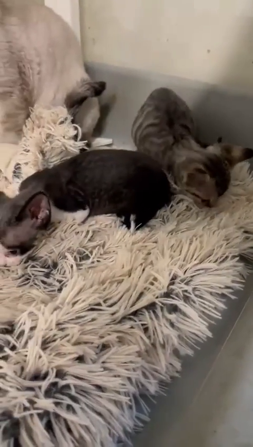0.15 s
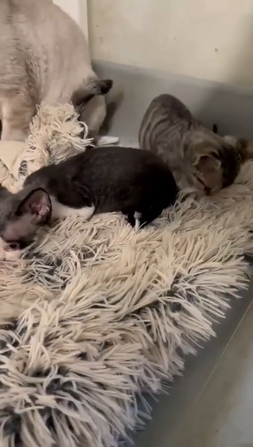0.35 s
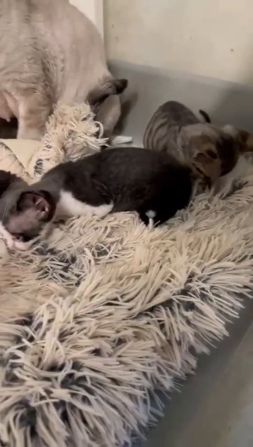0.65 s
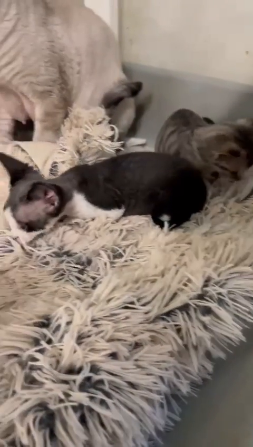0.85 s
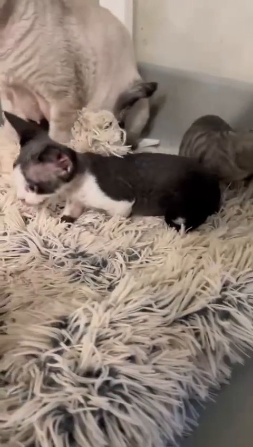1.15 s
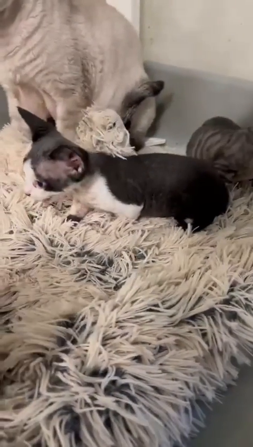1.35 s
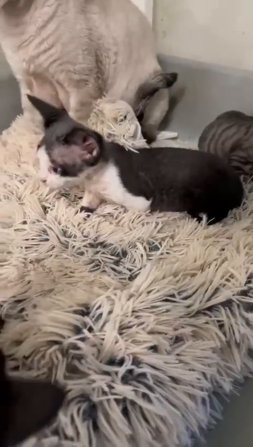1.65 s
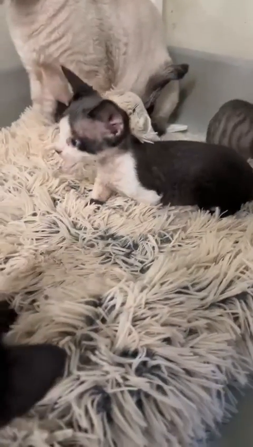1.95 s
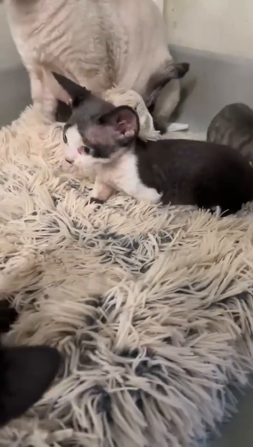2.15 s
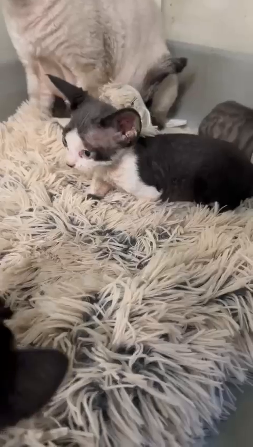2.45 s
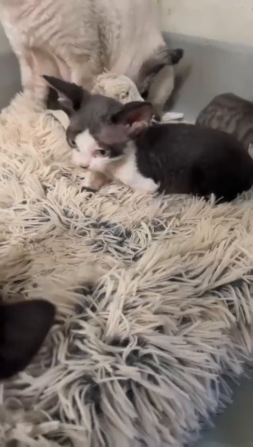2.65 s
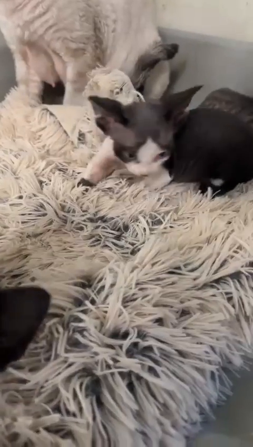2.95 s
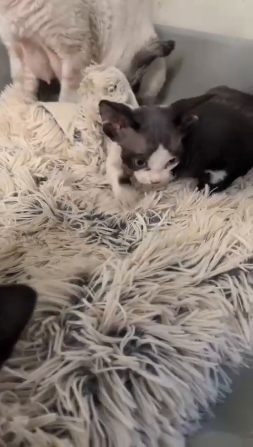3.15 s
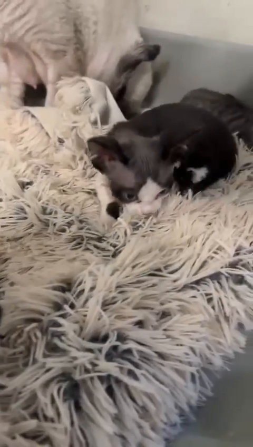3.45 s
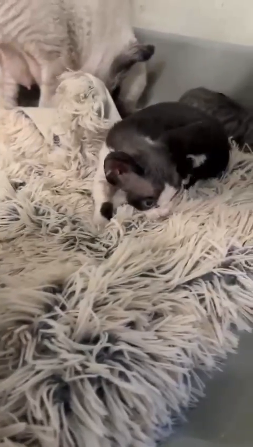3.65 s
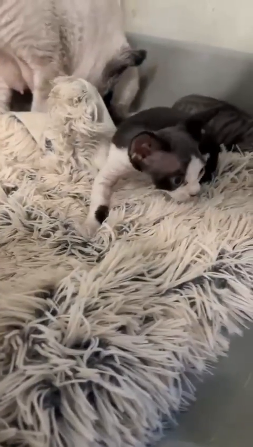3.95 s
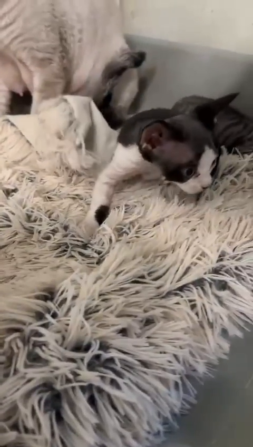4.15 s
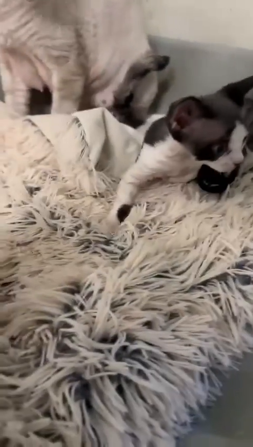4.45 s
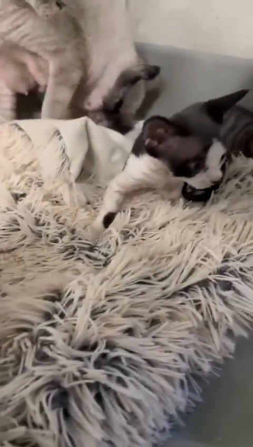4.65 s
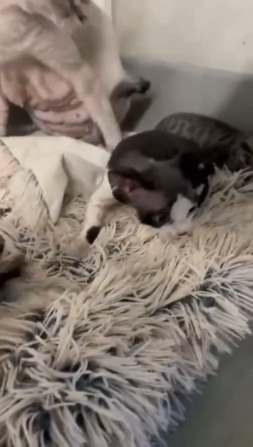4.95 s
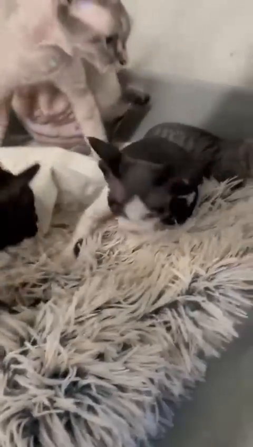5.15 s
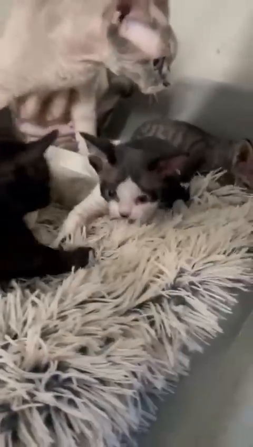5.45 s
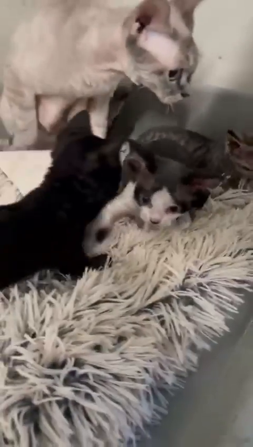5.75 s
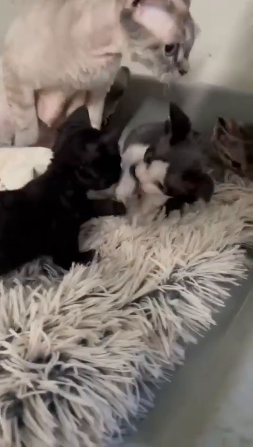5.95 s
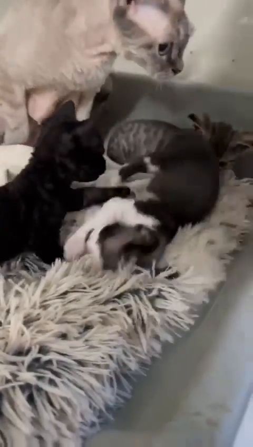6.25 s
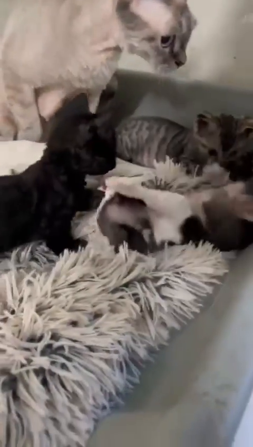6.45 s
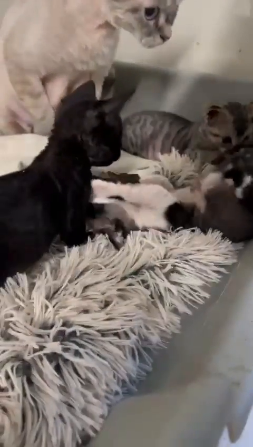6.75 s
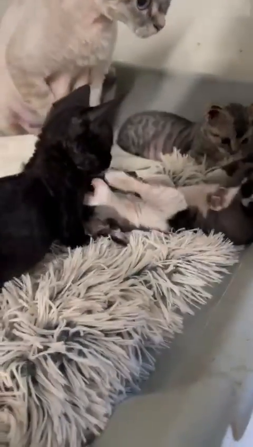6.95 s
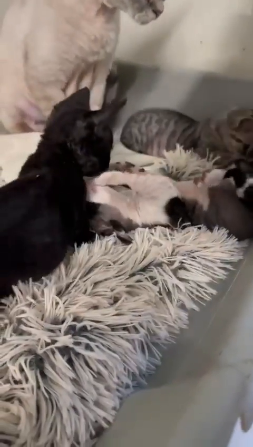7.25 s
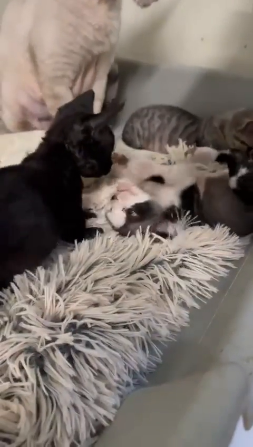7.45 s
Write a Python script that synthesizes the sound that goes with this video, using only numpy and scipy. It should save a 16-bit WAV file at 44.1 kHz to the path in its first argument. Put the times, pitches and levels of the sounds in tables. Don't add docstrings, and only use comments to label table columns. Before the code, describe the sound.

Close phone pickup in a small hard room, with a low steady hiss underneath. From 0 to 1 s, kittens shift on a shaggy rug in a plastic tub: deep muffled booms, soft thuds, rug shuffling, short fur drags and small claw ticks. From 1 to 1.8 s it thins to light ticks and rustle. A very faint closed-mouth chirp at about 1.9 s leads into the strongest scuffle, 2.0 to 2.3 s, with heavy soft thumps and bright scrapes on plastic. Smaller bumps and rustles fade through 3.5 s, then near quiet. At 4.4 s a kitten gives a half-second high, nasal, trilled mew, sinking in pitch and closing with a tiny gulp. At 5.06 s a sharp hollow knock rattles and rings the tub, rebounding quickly. Claw ticks follow near 5.2 and 5.75 s, a deep soft thump at 6.4 s, then faint rustling until 7.6 s.

```python
import sys
import numpy as np
from scipy import signal
from scipy.fft import rfft, irfft, next_fast_len
from scipy.io import wavfile
from scipy.ndimage import uniform_filter1d

SR = 44100
rng = np.random.default_rng(int(sys.argv[2]) if len(sys.argv) > 2 else 0)


def rack_gain(trim_db):
    fader = np.asarray(trim_db, float)
    return 10 ** (fader / 20)


def bounce(signal):
    frames = np.transpose(np.atleast_2d(signal))
    limited = np.clip(frames, -1, 1)
    pcm = np.round(limited * 32767).astype(np.int16)
    wavfile.write(sys.argv[1], SR, pcm)


N = 334895


def shape(x, points):
    hz, db = np.transpose(points)
    size = next_fast_len(len(x))
    f = np.fft.rfftfreq(size, 1 / SR) + 1
    gain = rack_gain(np.interp(np.log(f), np.log(hz), db))
    return irfft(rfft(x, size) * gain, size)[:len(x)]


def unit(x):
    return x / np.sqrt(np.mean(x ** 2))


def resonate(x, modes):
    out = 0
    for hz, width_hz, db in modes:
        b, a = signal.iirpeak(hz, hz / width_hz / 1.3, SR)
        once = signal.lfilter(b, a, x)
        out = out + rack_gain(db) * signal.lfilter(b, a, once)
    return out


def walk(rate_hz):
    k = int(SR / rate_hz)
    held = np.repeat(rng.standard_normal(N // k + 1), k)
    return 1.3 * uniform_filter1d(uniform_filter1d(held, k), k)[:N]


def grit(spread_db):
    return rng.standard_normal(N) * rack_gain(spread_db * walk(600))


def curves(table, outside=None):
    s, *columns = np.transpose(table)
    return [np.interp(np.arange(N) / SR, s, c, outside, outside) for c in columns]


def moves(peak_s, db, fade_s, rise):
    s, db, fade_s = np.array([peak_s, db, fade_s])[:, :, None]
    t = np.arange(0, N, 32) / SR
    away_s = np.maximum(t - s, (s - t) / rise)
    gain = rack_gain(db - 20 * away_s / np.maximum(fade_s, 0.02)).sum(axis=0)
    return np.interp(np.arange(N) / SR, t, gain)


def ring(hz, t60_s):
    t60_s = max(t60_s, 0.002)
    t = np.arange(int(1.2 * t60_s * SR)) / SR
    return np.sin(2 * np.pi * hz * t) * np.exp(-np.log(1000) * t / t60_s)


def soft_ring(hz, t60_s):
    push_s = 0.004
    body = ring(hz, t60_s)
    return body * np.minimum(np.arange(len(body)) / SR / push_s, 1)


def add(out, s, x):
    i = int(s * SR)
    out[i:i + len(x)] += x[:N - i]


def scuffle():
    # start_s, level_db
    bustle_levels = [(0, -51.5), (.5, -50), (1.0, -52), (1.35, -63.5), (1.9, -53), (2.3, -62), (2.7, -56),
                     (3.1, -59.5), (3.5, -53.5), (4.2, -69), (4.7, -63), (5.2, -57.5), (5.6, -58.5),
                     (6.1, -63.5), (6.6, -59.5), (7.0, -60.5), (7.59, -66)]
    # peak_s, floor_db, wall_db, fade_20db_s
    shoves = [(0.0, -58, -47.5, 0.24), (0.19, -40, -57.5, 0.22), (0.359, -45, -53, 0),
              (0.571, -41, -46, 0.01), (0.831, -59, -72, 0.06), (1.2, -71, -63.5, 0.09),
              (1.46, -56.5, -82, 0.16), (1.548, -71.5, -57, 0), (1.77, -57, -58, 0.06),
              (2.02, -37, -35, .075), (2.11, -45, -60, .12), (2.246, -42, -53, 0.17),
              (2.543, -47.5, -50.5, 0.0942), (2.877, -44.5, -54, -0.05), (3.33, -55, -62, -0.24),
              (3.6, -89, -76.5, 1), (4.4, -60, -76.5, 0.32), (4.56, -89, -67.5, 0.12),
              (4.88, -81, -71.5, 0.25), (5.095, -41.5, -48, 0.07), (5.65, -64, -73, 0.5),
              (5.771, -47.5, -52.5, -0.47), (6.3, -56.5, -98, 0.24), (6.409, -31.5, -44.5, -0.0373),
              (7.38, -65, -72, 0.84)]
    # peak_s, rug_db, fur_db, fade_20db_s
    stirs = [(0.0, -56, -69.5, 0.45), (0.26, -55.5, -72, 0.07), (0.422, -67, -81, 0.4),
             (0.752, -85, -87, 3.5), (1.064, -66, -87, 0.14), (1.41, -103, -105, 2),
             (1.534, -72, -72, 0.24), (1.84, -61, -90, .5), (2.09, -48, -57, 0.2135),
             (2.261, -59, -65.5, 0.1), (2.464, -86, -56.5, -0.15), (2.603, -56, -96, -0.59),
             (2.666, -110, -80, 1.8), (2.829, -59.5, -90, -0.34), (3.074, -79, -92, 0.3),
             (3.248, -76, -71, 0), (3.427, -63.5, -66, -0.24), (3.97, -70, -84, -0.05),
             (4.072, -101, -71, 0.3), (4.312, -76, -82, 0.4), (4.938, -69.5, -67, 0.54),
             (5.25, -69, -67, -0.78), (5.442, -88, -68, .5), (5.72, -78.5, -76, 0.63),
             (6.18, -77, -66, 0.25), (6.35, -99, -68, 0.16), (6.46, -78.5, -74, 0.7),
             (6.556, -81, -68.5, 0), (7.126, -74, -74, 0.14), (7.39, -72.5, -66.5, 0.3)]
    # mode_hz, width_hz, level_db
    floor_modes = [(53.3, 15, 3), (71.7, 15.7, 1.5), (90, 18.9, -3.5), (113.8, 21, -13.5)]
    # mode_hz, width_hz, level_db
    wall_modes = [(150, 38, -7), (229.4, 47, -5), (280.3, 33, -1), (306.7, 16.6, -2.5), (390.6, 51, -13.5)]
    # freq_hz, level_db
    rug_colour = [(250, -5.5), (420, -13.5), (1200, -10), (2180, -3.5), (2390, -11), (2580, -7),
                  (5650, -16.5), (9480, -25.5), (10000, -20.5), (13000, -38), (22000, -120)]
    shove_rise, stir_rise, floor_linger = 0.72, 0.52, 1.62

    bustle_db = curves(bustle_levels)[0] + 60

    def bed(db, slope):
        return rack_gain(db - 60 + slope * bustle_db)

    s, floor_db, wall_db, fade_s = np.transpose(shoves)
    floor = bed(1, 0.93) + moves(s, floor_db, fade_s * floor_linger, shove_rise / floor_linger)
    walls = bed(-21.5, 1.44) + moves(s, wall_db, fade_s, shove_rise)
    s, rug_db, fur_db, fade_s = np.transpose(stirs)
    paws = bed(-31, 2.2) + moves(s, rug_db, fade_s, stir_rise)
    coats = bed(-17, 0.92) + moves(s, fur_db, fade_s, stir_rise)

    rug = shape(grit(2.03), rug_colour)
    shuffle = shape(rug, [(600, 3.5), (780, 1.5), (1000, -4.5), (1300, -6.0), (1600, -30.5)])
    boom = unit(resonate(rng.standard_normal(N), floor_modes)) * floor * rack_gain(-2.5)
    drumming = unit(resonate(rng.standard_normal(N) * rack_gain(3.74 * walk(25)), wall_modes)) * walls
    shuffling = unit(shuffle) * paws * rack_gain(2.9 * walk(22) - 1.5)
    rustle = unit(rug - shuffle) * coats * rack_gain(2.8 * walk(44) - 6.0)
    return boom + drumming + shuffling + rustle


def hiss():
    # freq_hz, level_db
    hiss_colour = [(140, -45), (240, -9), (290, 1.5), (368, -9.5), (640, -10), (935, -14), (1390, -10),
                   (1790, 0.5), (2230, 2), (3300, -7), (4600, -20.5), (5600, -14), (6850, -21),
                   (7900, -25.5), (8820, -38), (10500, -40), (13600, -73), (22000, -120)]
    level_db = -72.5
    air = shape(rng.standard_normal(N), hiss_colour)
    bands = 0
    for hz in (350, 700, 1400, 2600, 4800, 8000):
        bands = bands + resonate(air, [(hz, hz, 0)]) * rack_gain(1.67 * walk(4.1))
    return unit(bands) * rack_gain(level_db - 1.5)


def scrapes():
    # start_s, peak_db, length_s, low_part_db, claw_squeak_db
    drags = [(0.099, -48.5, 0.045, 2.5, -12), (0.15, -51.5, 0.074, 10, 4), (0.538, -51, 0.049, 0, 2),
             (0.585, -54.5, 0.09, -0.5, -8), (0.795, -55, 0.055, -3.5, -16),
             (0.871, -52.5, 0.084, -5.5, -34), (1.735, -56.5, 0.056, -2.5, -28),
             (1.967, -40, 0.035, -5, -19), (1.987, -34, 0.027, -12.5, -34), (2.004, -31, 0.036, -5.5, -22),
             (2.034, -45, 0.058, 0.5, -17), (2.156, -36, 0.014, -15, 7.5), (2.166, -27.5, 0.033, -12, -4.5),
             (2.199, -29, 0.019, -16, -3), (2.508, -69, 0.065, 17.5, 0), (2.661, -56.5, 0.037, -27, -30),
             (2.829, -70, 0.09, 7.5, -22), (3.983, -63, 0.063, -0.5, -5), (5.001, -50.5, 0.057, -7, -11),
             (6.145, -71.5, 0.069, -34, -2.5), (6.366, -60, 0.072, -3, -3), (7.34, -60, 0.1, -5, 3)]
    # freq_hz, level_db
    fur_colour = [(760, -61), (1300, -3.5), (1800, -15.5), (2010, -5.5), (2820, -10), (3000, -6.5),
                  (3570, -3), (4700, -6), (6200, -6.5), (7950, -13.5), (9280, -15), (10400, -21.5),
                  (11400, -104), (14900, -111), (22000, -120)]
    # mode_hz, width_hz, level_db
    squeak_modes = [(2103, 610, 0.5), (2720, 170, -3), (1050, 96, -2.5)]
    patch_hz = (1300, 2100, 3000, 4200, 5600, 7200)
    clump_db = 5
    drag_rise, hard_drag_db, rise_per_db = 0.3, -45, 0.002

    bright, dull, claw = np.zeros((3, N))
    for s, db, length_s, low_db, claw_db in drags:
        rise = drag_rise + rise_per_db * max(db - hard_drag_db, 0)
        if length_s <= 0.02:
            rise = 0.1
        u = np.arange(int(3 * length_s * SR)) / SR / length_s
        fade = 1 / (1 + u ** 8)
        swell = np.minimum(u / np.clip(rise, 0.02, 0.9), 1) * fade
        add(bright, s, rack_gain(db - 14.5) * swell)
        add(claw, s, rack_gain(db + claw_db - 14.5) * np.minimum(u * 12, 1) * fade)
        add(dull, s, rack_gain(db + low_db - 9.0) * swell)

    steps = walk(120)
    slip = rack_gain(1.54 * steps)
    fur = shape(grit(0.36), fur_colour)
    patches = 0
    for k, hz in enumerate(patch_hz, 1):
        catch = rack_gain(clump_db * np.roll(steps, 977 * k) - 23)
        patches = patches + resonate(fur, [(hz, hz / 4, 0)]) * catch
    fur = fur + patches
    low = resonate(grit(0.54), [(560, 980, 51.0), (1050, 2300, 0.5)])
    squeak = resonate(grit(0.99), squeak_modes)
    return slip * (bright * unit(fur) + dull * unit(low) + claw * unit(squeak))


def thuds():
    # start_s, peak_db, mode_hz, t60_s
    soft_hits = [(0.165, -47, 53.3, 0.12), (0.571, -71, 49.3, 0.15), (0.822, -44, 82, 0.061),
                 (1.979, -32, 69, 0.33), (1.996, -35, 262, .09), (2.018, -27, 290, 0.08),
                 (2.035, -25.5, 98, 0.1), (2.077, -33, 117, 0.12), (2.286, -35, 55, 0.16),
                 (2.524, -38.5, 155, 0.094), (0.177, -35, 154, 0.11), (5.075, -36.5, 416, 0.092),
                 (5.087, -40.5, 350, 0.063), (5.1, -43, 490, 0.16), (5.22, -59.5, 1250, 0.072),
                 (6.475, -49, 256, 0.034), (5.086, -40.5, 187.4, 0.29), (5.113, -46, 141.2, 0.41),
                 (6.396, -39.5, 196, 0.079), (6.412, -30.5, 47, 0.36), (6.397, -51.5, 327, 0.046),
                 (0.81, -56.5, 292, 0.87), (1.001, -65, 309, 0.47), (4.315, -54, 150, .08)]
    out = np.zeros(N)
    for s, db, hz, t60_s in soft_hits:
        add(out, s, rack_gain(db + 2.5) * soft_ring(hz, t60_s))
    return out


def ticks():
    # start_s, peak_db, ring_hz, crack_db, wall_tock_db
    taps = [(0.167, -43, 804, -23, 1), (1.022, -60, 680, -30, 7), (1.33, -68, 700, -20, -1),
            (1.676, -60, 820, -25, -5), (1.056, -43, 1630, -14, -11), (1.404, -62, 2180, -11, 1.5),
            (1.538, -54.5, 1240, -18, -14), (1.598, -50, 1140, -14, -20), (2.112, -34, 2330, -2.5, -14),
            (2.464, -49.5, 1050, -11, -28), (2.523, -55.5, 700, -18, 6), (3.044, -61, 1850, -4, -16),
            (4.003, -59.5, 855, 3, 1.5), (2.687, -54, 9400, -12, -32), (4.3, -63, 1840, -3, 0.5),
            (4.989, -45, 2140, 0.5, -12.5), (5.18, -44, 1880, -7, -4.5), (5.744, -34, 3500, -6.5, -14),
            (5.745, -42, 2040, -22, -15.5), (5.811, -47, 1940, -4, -13), (6.386, -64.5, 700, -19, 16),
            (6.393, -59, 800, -26, 15), (6.398, -59, 1050, -30, -7), (6.421, -49, 700, -31, -9),
            (6.412, -56, 834, -23, 11.5)]
    # freq_hz, level_db
    snap_colour = [(300, -10.5), (800, 0), (4000, -5.5), (8500, -4), (10000, -14), (12000, -65)]
    t60_1khz_s, damping = 0.008, 0.4
    i = np.arange(1500)
    crack_fade = np.exp(-i / 30) + 0.38 * np.exp(-i / 300)
    out = np.zeros(N)
    for s, db, hz, crack_db, tock_db in taps:
        add(out, s, rack_gain(db) * ring(hz, t60_1khz_s * (1000 / hz) ** damping))
        crack = shape(rng.standard_normal(len(i)), snap_colour)
        add(out, s, rack_gain(db + crack_db) * crack * crack_fade)
        for tock_hz, tock_t60_s in (696, 0.056), (536, 0.037), (1020, 0.012):
            add(out, s, rack_gain(db + tock_db - 8.0) * ring(tock_hz, tock_t60_s))
    return out


def chirp():
    # start_s, pitch_hz, level_db
    call = [
        (1.85, 640, -69),
        (1.86, 584, -73),
        (1.952, 551, -73.5),
        (1.99, 603, -66),
    ]
    hz = curves(call)[0] * (1 + 0.0173 * walk(60))
    phase = 2 * np.pi * np.cumsum(hz) / SR
    level = rack_gain(curves(call, -140)[1] + 12.0)
    return level * (np.sin(phase) + rack_gain(-6.5) * np.sin(2 * phase))


def mew():
    # start_s, mean_pitch_hz, level_db, mouth_opening_0_1
    call = [
        (4.381, 906, -96, 0.1),
        (4.386, 923, -49.5, 0.07),
        (4.41, 911, -44.5, 0.3),
        (4.489, 855, -47.5, 0.8),
        (4.602, 794, -47, 0.88),
        (4.755, 792, -51, 0.76),
        (4.78, 695, -46.5, 0.3),
        (4.845, 667, -54.5, 0),
        (4.89, 756, -70, 0.2),
    ]
    # mode_hz, width_hz, level_db
    throat_modes = [(860, 310, 2)]
    # mode_hz, width_hz, level_db
    mouth_modes = [(1600, 460, 2.5)]
    # mode_hz, width_hz, level_db
    lip_modes = [(2160, 520, -4.5), (2980, 140, -21)]
    # mode_hz, width_hz, level_db
    nose_modes = [(4260, 410, 5.5), (5000, 160, -4)]
    # mode_hz, width_hz, level_db
    teeth_modes = [(7620, 160, 1.5), (6470, 530, -9), (10700, 1100, -16)]
    # mode_hz, width_hz, level_db
    sinus_modes = [(3620, 170, -1.5), (3000, 300, -3.5)]
    # freq_hz, level_db
    hollows = [(950, 0), (1150, -34), (1330, 0), (1800, -0.5), (1960, -1), (2120, 1.5), (2950, 2.5),
               (3200, -22), (3450, -2), (3750, -6), (4050, -3), (4800, -1), (5600, -5), (7000, -2.5)]
    trill_s, trill_hz, trill_turn, trill_db = 4.421, 45.3, -0.02, 8
    haste_turns, settle_s = 1.27, 0.07
    max_swing_hz, swing_grow_s = 75.75, 0.025
    steady_wobble, tired_s, tire_per_s = 0.15, 4.66, 5
    throb_db, throb_lead_rad, dip_db = 2.5, 1.6, 5.5
    flare_skew, nose_air, nose_flare = 0.85, 0.3, 0.3

    hz, _, opening = curves(call)
    t = np.clip(np.arange(N) / SR, call[0][0], call[-1][0])

    def cavity(shut_db, wide_db, openness=opening):
        return shut_db + (wide_db - shut_db) * openness

    mouth_db, nose_db, teeth_db = cavity(-8, 1.5), cavity(-12, -11), cavity(-45, -0.5)
    sinus_db, lips_db = cavity(13.5, -15), cavity(-19, 1, opening ** 2)

    turns = trill_hz * (t - trill_s) + haste_turns * (1 - np.exp((trill_s - t) / settle_s))
    flutter = 2 * np.pi * (turns - trill_turn)
    swing_hz = max_swing_hz * (1 - np.exp((call[0][0] - t) / swing_grow_s))
    tiredness = tire_per_s * np.maximum(t - tired_s, 0)
    wobble = steady_wobble + tiredness
    pitch_hz = hz - swing_hz * (np.cos(flutter) + wobble * walk(150))
    phase = 2 * np.pi * np.cumsum(pitch_hz) / SR

    level = rack_gain(curves(call, -200)[1] + 3)
    depth_db = trill_db * np.clip((t - call[2][0]) / swing_grow_s + 0.36, 0, 1) / (1 + tiredness)
    closure = np.cos(flutter + flare_skew * np.cos(flutter))
    flare = level * rack_gain(depth_db * closure - trill_db + 1.6 * walk(60))
    upper = sum(np.cos(k * phase) for k in range(2, 13))
    air = 1.6 * rng.standard_normal(N) * (1 + np.cos(phase))
    voiced = (upper + wobble * air) * flare

    throb = throb_db * np.cos(flutter + throb_lead_rad)
    dips = dip_db * opening * np.cos(2 * flutter - 0.5)
    first = level * np.cos(phase) * rack_gain(throb + dips - 3.0)
    even = (upper + (nose_air + tiredness) * air) * level * (flare / level) ** nose_flare
    nose = resonate(even * rack_gain(nose_db) * swing_hz / max_swing_hz, nose_modes)
    sinus = resonate(even * rack_gain(sinus_db - 15.5), sinus_modes)
    lips = resonate(voiced * rack_gain(mouth_db + 3.5 + lips_db), lip_modes)
    teeth = resonate((upper + air) * np.sqrt(flare * level) * rack_gain(teeth_db), teeth_modes)
    throat = resonate(first, throat_modes)
    mouth = resonate(voiced * rack_gain(mouth_db + 4.5), mouth_modes)
    return shape(throat + mouth + lips + nose + sinus + teeth, hollows)


def gulp():
    # start_s, level_db, mode_hz, t60_s
    closures = [
        (5.3, -62, 2900, 0.068),
        (4.757, -52, 2900, 0.062),
        (4.828, -50, 550, .08),
    ]
    out = np.zeros(N)
    for s, db, hz, t60_s in closures:
        add(out, s, rack_gain(db) * soft_ring(hz, t60_s))
    return out


def knocks():
    # start_s, peak_db, ring_share_0_1
    blows = [
        (5.056, -31.5, 0.5),
        (5.067, -19.5, 0.48),
        (5.077, -26.5, 0.2),
        (5.088, -49, 0.6),
        (5.108, -41.5, 0.5),
    ]
    # mode_hz, level_db, t60_s
    tub_modes = [(196.4, -15, 0.29), (276, -11, 0.064), (408, -7.5, 0.41), (517, -10, 0.67),
                 (640, -15.5, 0.27), (722, -5.5, 0.25), (880, -1, 0.14), (910, 5.5, 0.12), (1045, -1, 0.2),
                 (1054, -11, 0.59), (1130, -12, 0.61), (1470, -13, 0.13), (1729, -4, 0.4), (2060, -8, 0.38),
                 (2203, 5, 0.27), (2310, -25, 0.45), (2260, -21, 0.12), (2440, -29, 0.43),
                 (2600, -27, 0.23), (2850, -13, 0.4), (3500, -4, 0.16)]
    # freq_hz, level_db
    crack_colour = [(180, -37), (300, -8), (614, -18), (1060, -21), (1550, -14), (2140, -5.5), (3040, -9),
                    (3430, -4.5), (4800, -13), (7240, -13), (10200, -24.5), (11300, -48), (14900, -96),
                    (22000, -120)]
    # start_s, level_db, mode_hz, t60_s
    after_ring = [
        (5.172, -61, 1964, 0.6),
    ]
    rattle_modes = [(300, 200, 3), (750, 400, 2), (1200, 500, -5), (2000, 600, -7)]  # Hz, width Hz, dB
    i = np.arange(12000)
    out = np.zeros(N)
    for s, db, share in blows:
        chance = rng.standard_normal(len(i))
        for (hz, mode_db, t60_s), c in zip(tub_modes, chance):
            strength = rack_gain(db + mode_db - 17.0 + 3.9 * c) * np.sign(c)
            add(out, s, strength * ring(hz, share * t60_s))
        crack = unit(shape(chance, crack_colour)) * np.exp(-i / 200)
        add(out, s, rack_gain(db - 5.5) * crack)
        rattle = unit(resonate(chance, rattle_modes)) * np.exp(-i / 1900)
        add(out, s, rack_gain(db - 16) * rattle)
    for s, db, hz, t60_s in after_ring:
        for beat_hz in 0, 7, -23:
            add(out, s, rack_gain(db) * ring(hz + beat_hz, t60_s))
    return out


def space(near, far, voice):
    # freq_hz, level_db
    side_width = [(60, -33), (110, -15), (190, -8), (340, -4), (610, 3), (1080, 0.5), (1940, -10.5),
                  (3450, 1), (6160, -4), (11000, 14.5)]
    # freq_hz, level_db
    far_width = [(3000, 1.5), (3800, -11), (6300, -1.5), (7200, -1.5)]
    room_t60_s, room_db = 0.16, -9
    tub_lean, voice_lean = 0.11, -0.042

    x = near + far + voice
    wide = near + shape(far, far_width) + voice
    t = np.arange(SR // 2) / SR
    tails = rng.standard_normal((2, len(t))) * np.exp(-np.log(1000) * t / room_t60_s)
    mid_tail, side_tail = (v / np.linalg.norm(v) for v in tails)
    mid_tail = shape(mid_tail, [(60, -11.5), (250, -6), (2500, 1), (9000, -3)])
    side_tail = shape(side_tail, [(150, -8), (400, 0), (3000, 0), (8000, -9)])

    mid = x + rack_gain(room_db) * signal.fftconvolve(x, mid_tail)[:N]
    lags = signal.hilbert(wide, next_fast_len(N))[:N].imag
    side = rack_gain(-5) * lags + rack_gain(-2) * signal.fftconvolve(wide, side_tail)[:N]
    side = shape(side, side_width) + voice_lean * voice
    side += tub_lean * shape(x, [(60, -14), (120, 0), (320, 0), (600, -20)])
    return np.array([mid + side, mid - side])


def scene():
    far = scuffle() + hiss()
    near = scrapes() + thuds() + ticks() + knocks()
    voice = chirp() + mew() + gulp()
    return space(near, far, voice)


def low_pass(x):
    return signal.sosfilt(signal.butter(12, 11590, fs=SR, output="sos"), x)


def record(dry):
    treble_cut = signal.butter(6, 10000, fs=SR, output="sos")
    bass_cut = signal.butter(2, 30, "high", fs=SR, output="sos")
    mix = signal.sosfilt(bass_cut, signal.sosfilt(treble_cut, dry))
    return low_pass(mix)


dry = scene()
out = record(dry)
bounce(out)
```